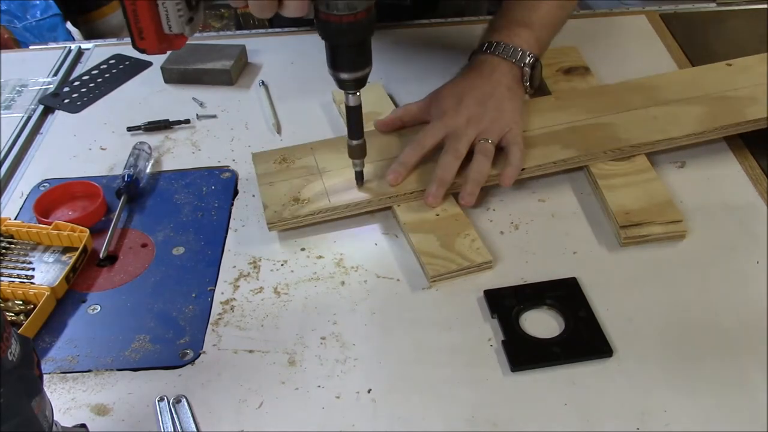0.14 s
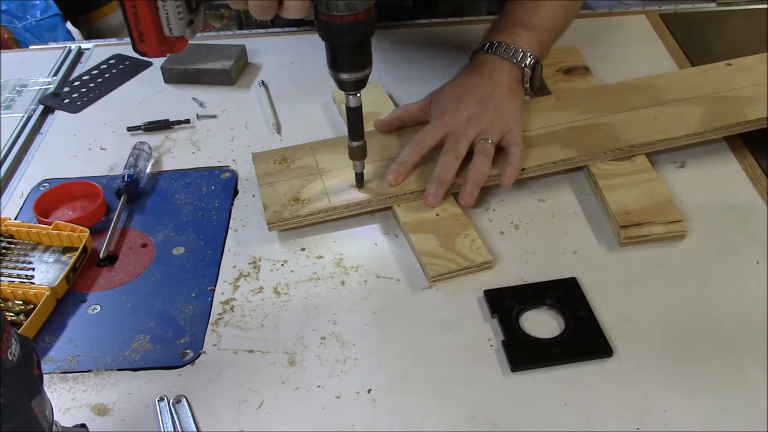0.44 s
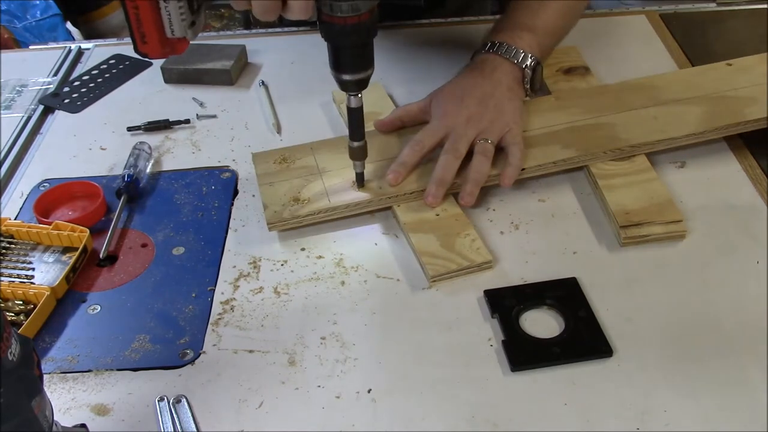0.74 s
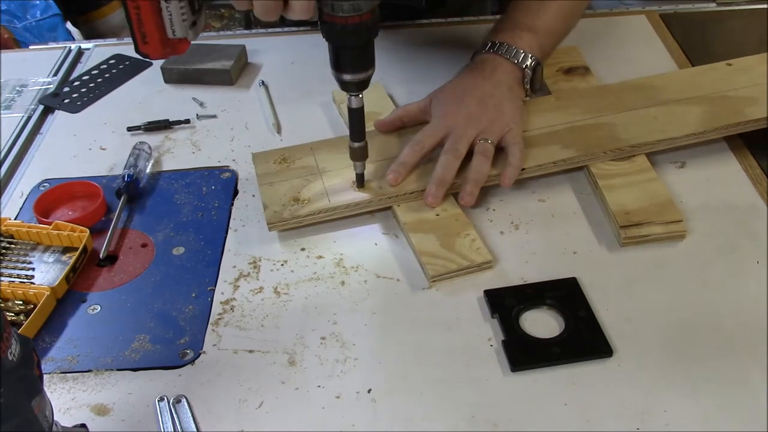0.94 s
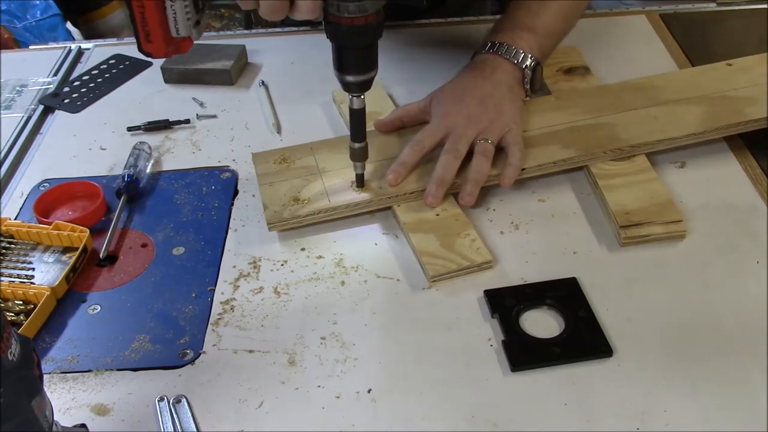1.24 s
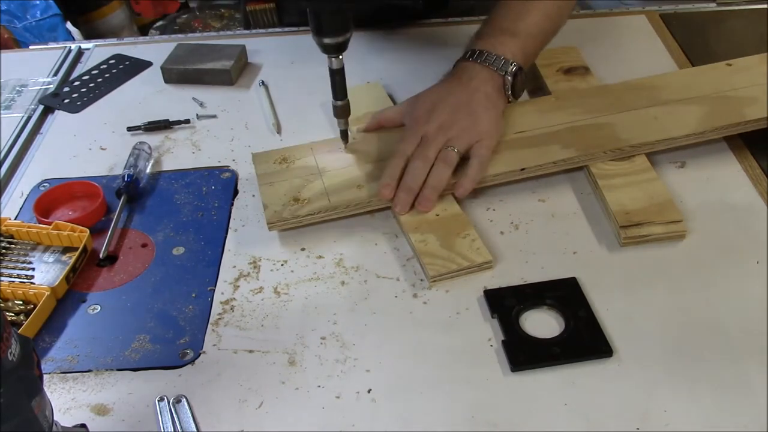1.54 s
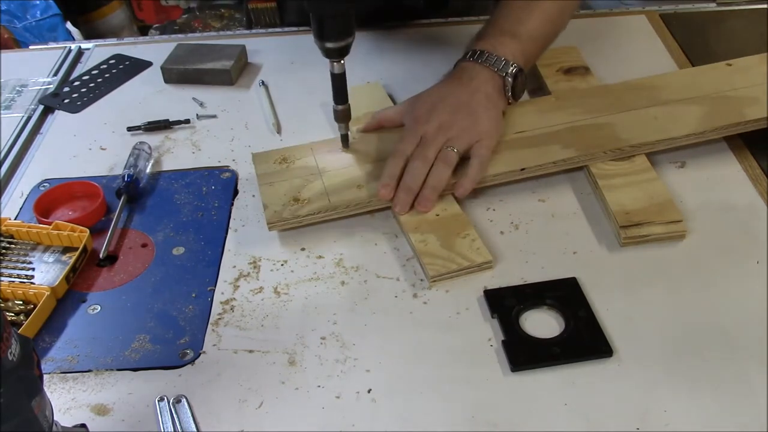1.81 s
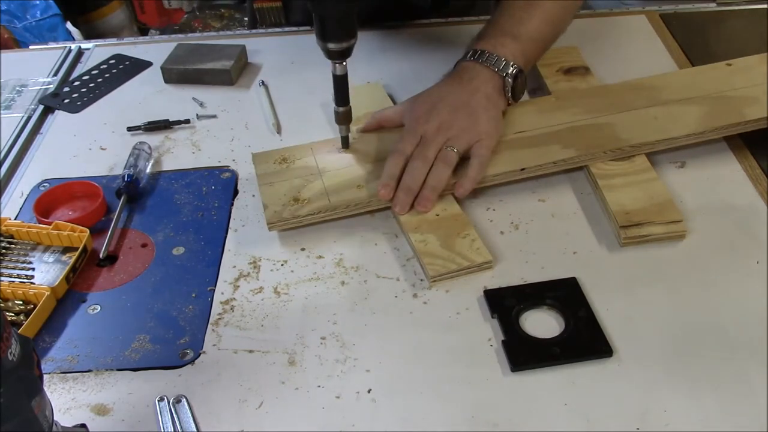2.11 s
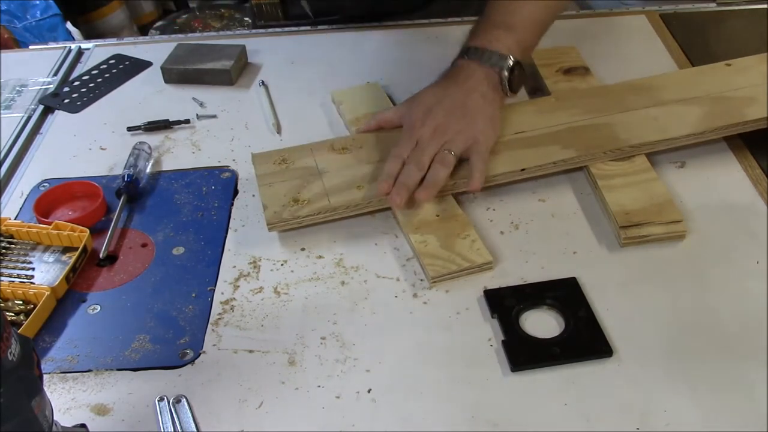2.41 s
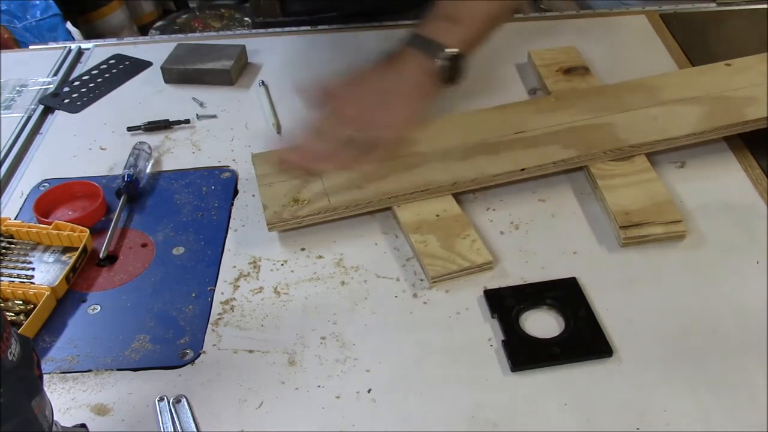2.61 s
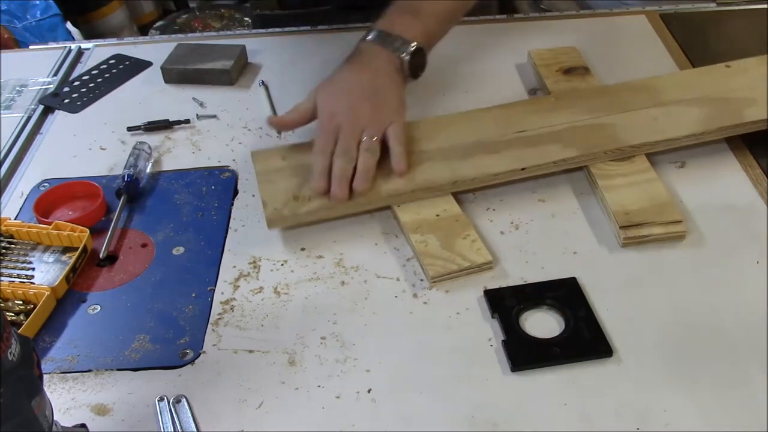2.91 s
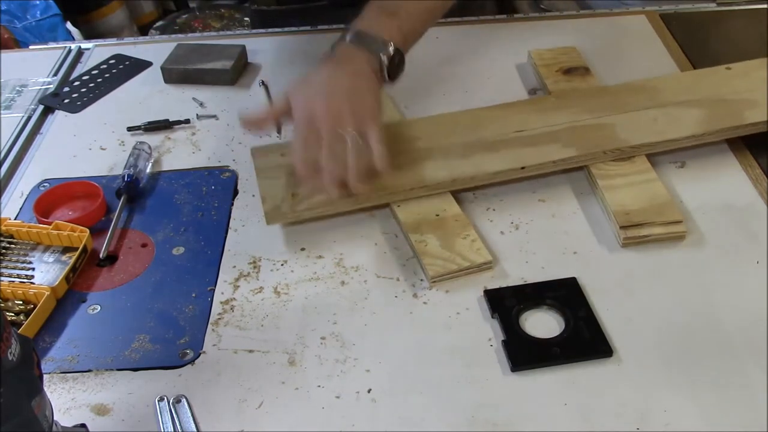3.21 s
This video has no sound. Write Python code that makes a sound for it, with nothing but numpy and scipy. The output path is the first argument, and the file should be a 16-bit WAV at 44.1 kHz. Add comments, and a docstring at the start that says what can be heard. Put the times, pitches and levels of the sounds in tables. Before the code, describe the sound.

Cordless drill boring wood in two short runs, followed by brushing and light wooden knocks.

```python
"""A cordless drill countersinks a board in two passes: its gears whine and sag as the bit bites and
rasps, the chuck rattles, and the brake clacks at each stop. Then a hand sweeps the chips off three
times, hissing over the wood and knocking the loose board on its supports.
A small hard-walled workshop, heard in mono over a faint hiss that differs in each channel."""
import sys
import numpy as np
from scipy import signal
from scipy.fft import rfft, irfft, next_fast_len
from scipy.io import wavfile
from scipy.ndimage import map_coordinates

SR = 44100
rng = np.random.default_rng(int(sys.argv[2]) if len(sys.argv) > 2 else 0)


def generate_wav(signal):
    """Clip the signal to [-1, 1] and save it as 16-bit WAV at the path in sys.argv[1]."""
    frames = np.transpose(np.atleast_2d(signal))
    scaled = np.clip(frames, -1, 1) * 32767
    pcm = np.round(scaled).astype(np.int16)
    wavfile.write(sys.argv[1], SR, pcm)


N = 147735

# Per pass: t/s, mesh f/Hz, mesh harmonic 1, 2, 3 level/dB, rasp level/dB (levels before trim)
PASSES = [
    [(0, 1316, -50, -41, -51, -50), (0.1, 1313, -50, -41, -50, -48), (0.25, 1303, -53, -45, -49, -47),
     (0.5, 1297, -56, -45, -47, -45), (0.75, 1290, -59, -45, -47, -45), (1.0, 1282, -59, -48, -46, -44),
     (1.12, 1273, -54, -46, -48, -44), (1.25, 1264, -53, -45, -47, -43), (1.33, 1267, -54, -42, -47, -44),
     (1.355, 1287, -59, -47, -52, -58), (1.39, 1299, -49, -44, -61, -58), (1.43, 1296, -51, -46, -66, -58)],
    [(1.501, 1297, -51, -46, -51, -52), (1.6, 1300, -50, -47, -48, -48), (1.75, 1292, -55, -48, -46, -46),
     (1.9, 1283, -61, -51, -47, -44), (2.02, 1272, -55, -46, -47, -44), (2.12, 1258, -54, -49, -51, -43),
     (2.21, 1252, -55, -50, -50, -43), (2.29, 1271, -57, -48, -54, -49), (2.34, 1285, -54, -49, -59, -58),
     (2.4, 1301, -54, -46, -56, -58)],
]
# Weaker gear lines: motor order, free-running level/dB, full-load gain/dB
GEAR_LINES = [(3, -74.5, 4), (5, -70, 9), (9, -64.5, 8.5), (10, -58.5, 7), (11, -81.5, -4),
              (20, -53.5, -5.5), (21, -58, 0), (24, -76, 15.5), (28, -59, 3), (32, -58, 1.5), (43, -88, 3),
              (44, -64, 21), (45, -68, 9)]
# Cooling air spectrum: f/Hz, level/dB
MOTOR_AIR = [(60, -29.5), (200, -31.5), (380, -29), (600, -18.5), (780, -16), (1050, -10.5), (1400, -7.5),
             (1900, -12), (2600, -3), (3700, 0), (4300, -3.5), (5200, -2.5), (6400, 4.5), (8500, 2),
             (11500, 0.5), (14000, 4.5), (15800, 1)]
# Cutting spectrum: f/Hz, level/dB
RASP = [(300, -45), (700, -26.5), (1050, -18), (1500, -15), (2100, -23), (2500, -6.5), (2900, 2), (3250, 3),
        (3700, -1.5), (4200, -10.5), (6000, -20), (15000, -19.5)]
MESH_ORDER, WHISTLE_ORDER, GEAR_RATIO = 4, 40, 19
FREE_MESH_HZ, LOADED_MESH_HZ = 1305, 1260
MESH_TRIM_DB, RASP_TRIM_DB = [-0.5, -0.35, 0], 0.2
BRAKE_S, BRAKE_DB_PER_S, GEARS_UNLOAD_S = 0.026, 1200, 0.011


def drill_pass(rows):
    """Gear lines, cooling air and the rasp of the bit follow the motor until the brake stops it."""
    t = np.arange(N) / SR
    times, *columns = np.transpose(rows)
    mesh_hz, *mesh_db, rasp_db = [np.interp(t, times, column) for column in columns]
    load = np.clip((FREE_MESH_HZ - mesh_hz) / (FREE_MESH_HZ - LOADED_MESH_HZ), 0, 1.3)
    braking_s = np.maximum(t - times[-1], 0)
    jitter = (0.00056 + 0.0006 * load) * wobble(55) + 0.00201 * wobble(400)
    motor_hz = mesh_hz / MESH_ORDER * np.exp(-(braking_s / BRAKE_S) ** 2) * (1 + jitter)
    angle = 2 * np.pi * np.cumsum(motor_hz) / SR
    chuck_turn = np.sin(angle / GEAR_RATIO)
    whine = sum(gear_line(MESH_ORDER * k * angle, db + trim + 2 * chuck_turn, 0.13, 0.88)
                for k, db, trim in zip((1, 2, 3), mesh_db, MESH_TRIM_DB))
    whine += sum(gear_line(order * angle, db + gain_db * load, blur_rad=0.86, flutter_db=3)
                 for order, db, gain_db in GEAR_LINES)
    whine += gear_line(WHISTLE_ORDER * angle, -53 + 7 * load, blur_rad=0.5, flutter_db=2.6)
    air = amp(-40 + 0.46 * chuck_turn) * noise(MOTOR_AIR, grain_db=1.3)
    ripple_db = 0.53 * chuck_turn + 1.3 * np.sin(2 * angle)
    rasp = amp(rasp_db + RASP_TRIM_DB + ripple_db) * noise(RASP, grain_db=-0.5)
    meshing = np.exp(-(braking_s / GEARS_UNLOAD_S) ** 2)
    running = (t >= times[0]) * amp(-BRAKE_DB_PER_S * np.maximum(braking_s - 0.014, 0))
    return running * (meshing * (whine + chuck_rattle(rasp_db)) + air + rasp)


def gear_line(phase, db, blur_rad, flutter_db):
    """One tone locked to the motor, wavering in level and phase."""
    peak = np.sqrt(2) * amp(db + flutter_db * wobble(28.68))
    return peak * np.sin(phase + blur_rad * wobble(110) + rng.uniform(0, 2 * np.pi))


# Chuck and bit resonances: f/Hz, width/Hz, level/dB
CHUCK_RING = [(578, 53, -2), (950, 200, -29)]


def chuck_rattle(rasp_db):
    """Chuck and bit rattle at their low resonances, harder while the bit cuts."""
    def response(hz):
        ring = sum(amp(db) * 1j * hz * width / (centre ** 2 - hz ** 2 + 1j * hz * width)
                   for centre, width, db in CHUCK_RING)
        return ring * hz / np.hypot(hz, 900)

    level_db = -64.5 + 0.5 * (rasp_db - rasp_db.max()) + 2.54 * wobble(110)
    return amp(level_db) * unit(filtered(rng.standard_normal(N), response))


# Jolts: t/s, level/dB
JOLTS = [(.704, -48.5), (.907, -56.5), (1.07, -52.5), (1.093, -55), (1.389, -55.5), (1.525, -51),
         (2.3615, -42.5)]
# Jolt modes: f/Hz, level/dB
JOLT_MODES = [(545, -0.5), (770, -14)]


def bit_jolts():
    """The bit jolts in its seat and rings briefly."""
    t = np.arange(N) / SR
    return sum(amp(db + mode_db) * swell(start, rise_s=0.004) * np.sin(2 * np.pi * hz * (t - start))
               for start, db in JOLTS for hz, mode_db in JOLT_MODES)


# Spindle impacts: t/s, level/dB
CLACKS = [(1.438, -49), (1.4415, -26), (1.457, -45), (2.4095, -30), (2.4135, -28.5)]
# Impact spectrum: f/Hz, level/dB
CLACK_SPECTRUM = [(200, -35), (1200, -34), (1700, -33), (2200, -3), (3200, 5), (3900, -2), (4800, -1),
                  (15000, -8)]


def brake():
    """The spindle locks with a clack and a dying rattle."""
    envelope = bursts(CLACKS, t60_s=0.016) + amp(-21.5) * bursts(CLACKS, t60_s=0.18)
    return envelope * noise(CLACK_SPECTRUM)


# Sweep segments: t/s, length/s, hiss start, middle, end level/dB, rumble level/dB
SWEEPS = [(2.462, 0.1, -51, -44, -41.5, -79), (2.557, .135, -41, -41, -42.5, -76),
          (2.932, .1, -52, -32.5, -33.5, -47.5), (3.248, 0.037, -38.5, -36.5, -31, -38.5),
          (3.283, 0.14, -26, -32.5, -20, -33)]
# Board rocking: t/s, rise/s, level/dB
ROCKING = [(2.77, 0.043, -57), (2.877, 0.033, -47), (3.161, 0.0277, -56.5), (3.254, 0.044, -30)]
# Fine chips skidding: t/s, rise/s, level/dB
SKIDS = [(2.614, 0.021, -40), (2.735, 0.027, -54.5), (3.015, 0.011, -44)]
# Chips landing: t/s, level/dB
TICKS = [(2.872, -48.5), (2.894, -54)]
# Spectra: f/Hz, level/dB
BRUSH_SPECTRUM = [(100, -10.5), (400, -11.5), (700, -5.5), (1000, 6), (1350, -1.5), (1950, 4), (2800, 1.5),
                  (3800, 4.5), (4900, 2.5), (5900, -1), (6800, -7.5), (9000, -10.5), (13000, -15),
                  (15800, -22)]
RUMBLE_SPECTRUM = [(30, -42), (70, -27), (105, -14), (128, 10), (160, 0.5), (200, -13), (270, -6.5),
                   (450, -3.5), (700, -7), (1300, -6), (4000, -60)]
ROCK_SPECTRUM = [(40, -24), (100, -19), (126, 6), (155, 1), (190, -12), (260, -14.5), (450, -12),
                 (1500, -43.5)]
SKID_SPECTRUM = [(500, -43), (2500, 0), (4500, 8.5), (7000, -3), (11500, -5), (15800, -10)]


def hand():
    """Skin and chips hiss over the wood while the board rumbles and rocks; stray chips skid and tick."""
    t = np.arange(N) / SR
    hiss, shake = np.zeros(N), np.zeros(N)
    for start, length, *hiss_db, rumble_db in SWEEPS:
        end = start + length
        contact = np.clip((t - start) / 0.009, 0, 1) * np.clip((end - t) / 0.0054 + 1, 0, 1)
        stroke_db = np.interp(t, [start, start + length / 2, end], hiss_db)
        hiss = np.maximum(hiss, contact * amp(stroke_db))
        shake = np.maximum(shake, contact * amp(rumble_db))
    rocking = swells(ROCKING) * noise(ROCK_SPECTRUM)
    skids = swells(SKIDS) * noise(SKID_SPECTRUM, grain_db=5.5)
    envelope = hiss * amp(1.5 * wobble(200)) + bursts(TICKS, t60_s=0.12)
    brushing = envelope * noise(BRUSH_SPECTRUM, grain_db=-1.5)
    return brushing + skids + shake * noise(RUMBLE_SPECTRUM) + rocking


# Board modes: f/Hz, level/dB, t60/s
BOARD_MODES = [(144, -27.5, 0.045), (266, -15, 0.054), (412, -21.5, 0.055), (628, -6.5, 0.0162),
               (734, -2.5, 0.02), (836, -4.5, 0.022), (1021, -13, 0.057), (1625, -10.5, 0.023),
               (1960, -6, 0.02), (3860, -21, 0.033), (5100, -23, 0.024), (6050, -3, .02)]
# Knocks: t/s, level/dB, low-pass f/Hz
KNOCKS = [(2.9261, -17, 573), (2.944, -19, 260), (2.953, -17.5, 1130), (3.019, -24.5, 6000),
          (3.288, -12, 900), (3.2909, -7, 4500)]


def board():
    """The board knocks on its supports and rings; soft knocks reach only the low modes."""
    out, t = np.zeros(N + SR), np.arange(SR // 2) / SR
    attack = 1 - np.exp(-t / 0.0018)
    for start, db, cutoff_hz in KNOCKS:
        for hz, mode_db, t60_s in BOARD_MODES:
            decay = amp(db + mode_db + rng.normal(0, 1.3) - 60 * t / t60_s)
            lowpass = 1 / np.hypot(1, (hz / cutoff_hz) ** 2)
            tone = np.sin(2 * np.pi * hz * t * (1 + rng.normal(0, 0.018)))
            out[round(start * SR):][:len(t)] += attack * decay * lowpass * tone
    return out[:N]


# Room decay: f/Hz, t60/s
ROOM_DECAY = [(100, 0.53), (1000, 0.93), (4000, 0.44), (8000, 0.72), (15000, 0.6)]
# Room colour: f/Hz, level/dB
ROOM_COLOUR = [(100, 7), (1000, 3.5), (4000, 6), (8000, -6), (15000, -12)]


def workshop(x):
    """Hard walls return a diffuse tail after 5 ms, longest near 1 kHz."""
    hz, t, spectra = signal.stft(rng.standard_normal(SR * 3 // 4), SR, nperseg=256)
    decay = amp(-60 * t / along(ROOM_DECAY, hz)[:, None])
    tail = signal.istft(spectra * decay, SR, nperseg=256)[1]
    wet = signal.fftconvolve(x, np.pad(tail / np.linalg.norm(tail), (220, 0)))[:N]
    return filtered(wet, lambda hz: amp(along(ROOM_COLOUR, hz)))


def amp(db):
    """Decibels to gain."""
    return 10 ** (np.asarray(db) / 20)


def unit(x):
    """Scale to rms 1."""
    return x / np.sqrt(np.mean(x ** 2) + 1e-20)


def along(points, hz):
    """Interpolate (f/Hz, value) points on a log axis."""
    freqs, values = np.transpose(points)
    return np.interp(np.log(hz + 1), np.log(freqs + 1), values)


def wobble(knots_per_s):
    """Smooth random curve."""
    return map_coordinates(rng.standard_normal(N // 8), [np.arange(N) * knots_per_s / SR], mode="wrap")


def filtered(x, response):
    """Apply a frequency response."""
    size = next_fast_len(N + SR // 2)
    return irfft(rfft(x, size) * response(np.fft.rfftfreq(size, 1 / SR)), size)[..., :N]


def noise(spectrum, grain_db=0):
    """Coloured noise of rms 1, optionally broken into millisecond grains."""
    grains = rng.standard_normal(N) * amp(grain_db * wobble(1500))
    return unit(filtered(grains, lambda hz: amp(along(spectrum, hz))))


def bursts(rows, t60_s, rise_s=0.0014):
    """Sum of rising and dying envelopes for (t/s, level/dB) rows."""
    ages = [(np.maximum(np.arange(N) / SR - start, 0), db) for start, db in rows]
    return sum((1 - np.exp(-(age / rise_s) ** 2)) * amp(db - 60 * age / t60_s) for age, db in ages)


def swell(start_s, rise_s):
    """Rounded push, peaking at 1 after rise_s."""
    u = np.maximum(np.arange(N) / SR - start_s, 0) / rise_s
    return (u * np.exp(1 - u)) ** 2


def swells(rows):
    """Sum of pushes for (t/s, rise/s, level/dB) rows."""
    return sum(amp(db) * swell(start, rise) for start, rise, db in rows)


DRILL_SEND_DB, HAND_SEND_DB = -24, -9.5


def scene():
    """Drill, hand and board in the room, the same in both channels."""
    drill = sum(drill_pass(rows) for rows in PASSES) + bit_jolts() + brake()
    bench = hand() + board()
    mono = drill + bench + workshop(amp(DRILL_SEND_DB) * drill + amp(HAND_SEND_DB) * bench)
    return np.array([mono, mono])


# Background hiss spectrum: f/Hz, level/dB
HISS_SPECTRUM = [(25, -5), (100, 0.5), (400, -53), (2000, -36), (15000, 25.5)]
HISS_DB, LOW_CUT_HZ, TOP_HZ = -82, 72, 15850


def record(dry):
    """Deep bass and top treble are cut; a faint hiss, different in each channel, lies under the sound."""
    thin = signal.sosfilt(signal.butter(2, LOW_CUT_HZ, "high", fs=SR, output="sos"), dry)
    hiss = amp(HISS_DB) * np.array([noise(HISS_SPECTRUM), noise(HISS_SPECTRUM)])
    return filtered(thin + hiss, lambda hz: hz < TOP_HZ)


dry = scene()
out = record(dry)
generate_wav(out)
```